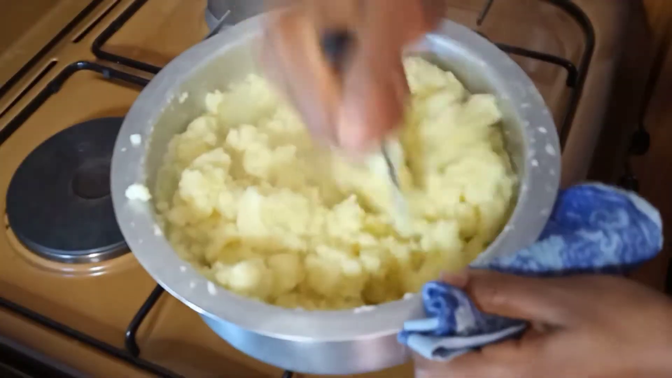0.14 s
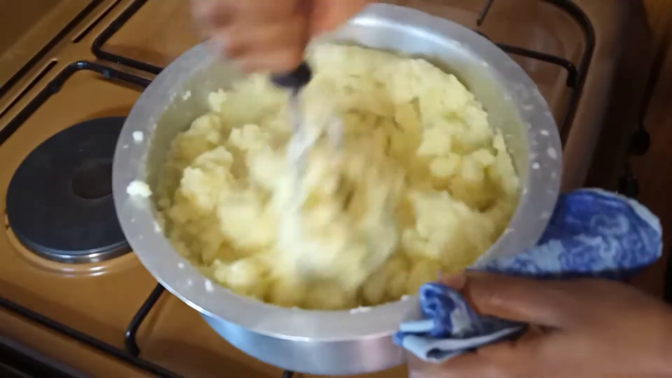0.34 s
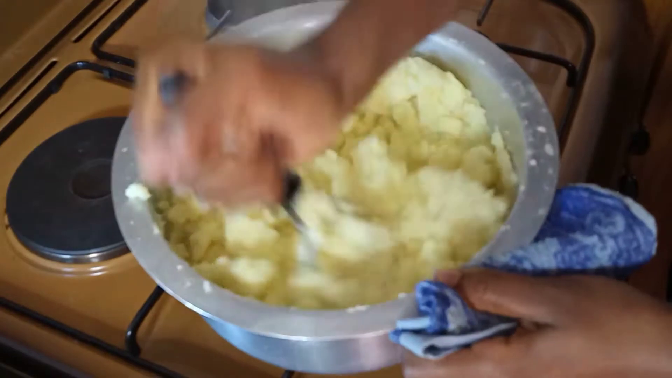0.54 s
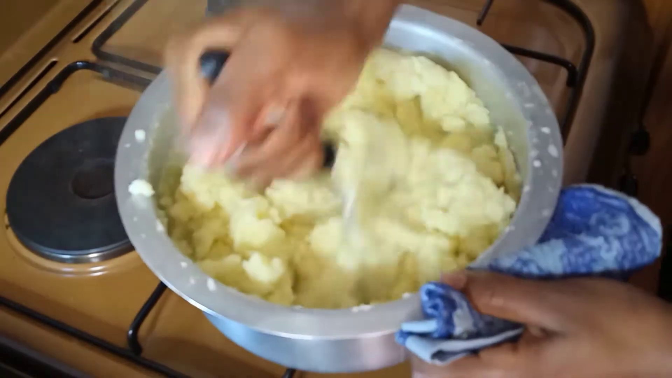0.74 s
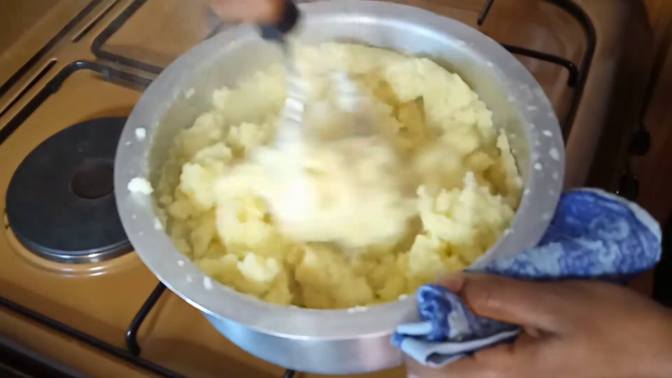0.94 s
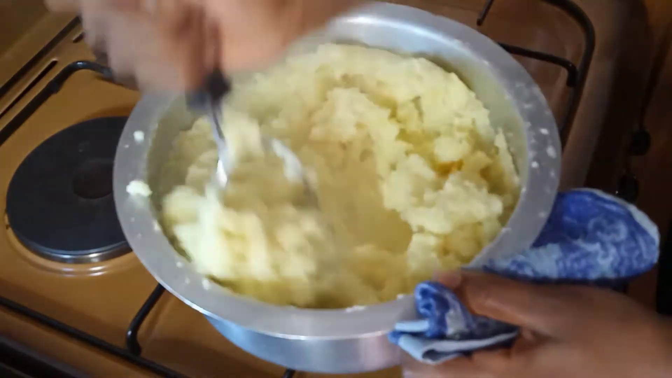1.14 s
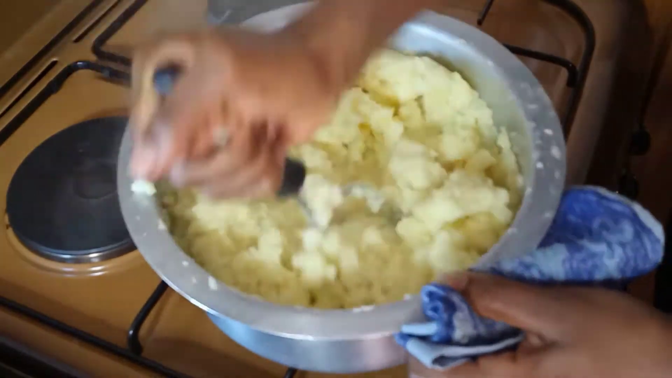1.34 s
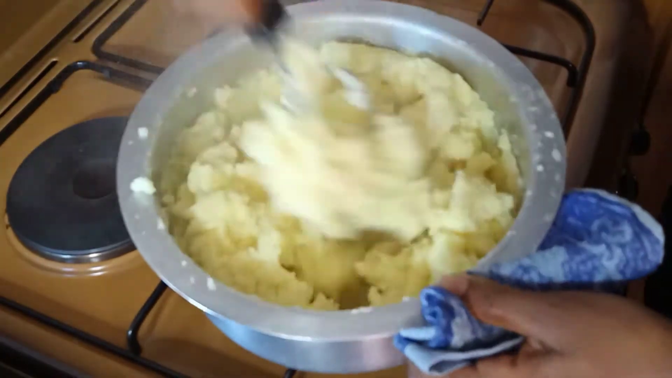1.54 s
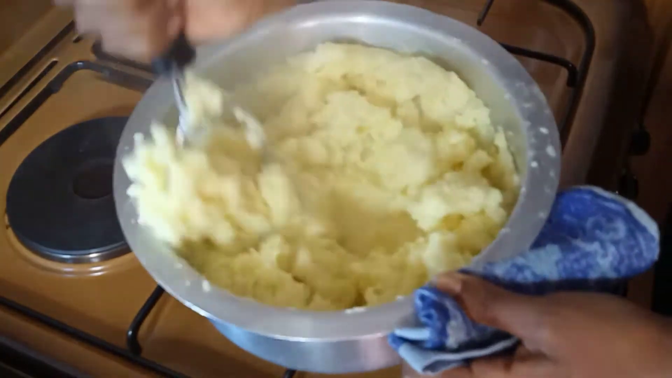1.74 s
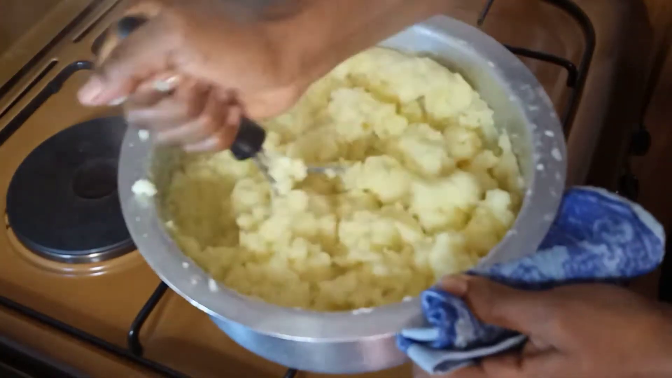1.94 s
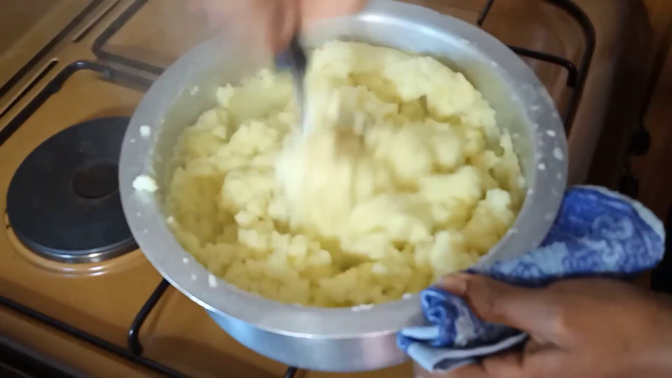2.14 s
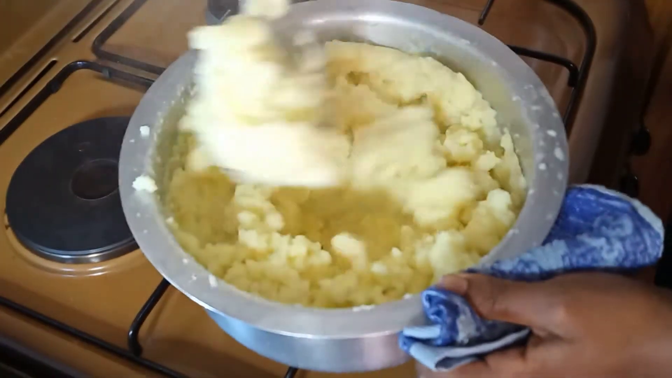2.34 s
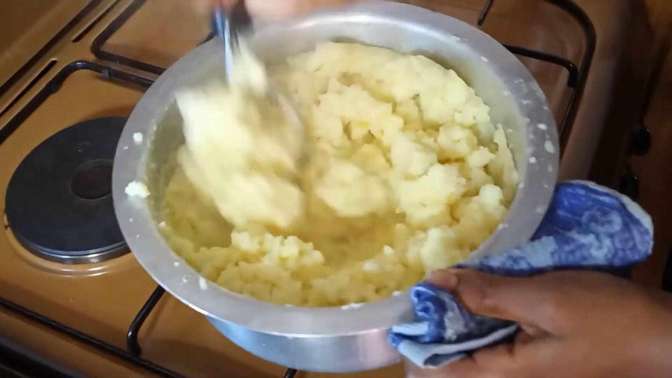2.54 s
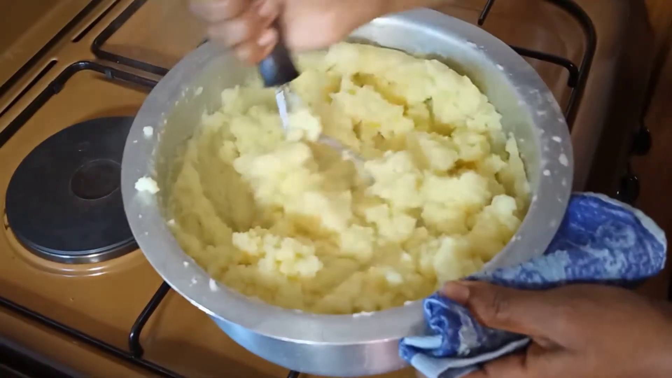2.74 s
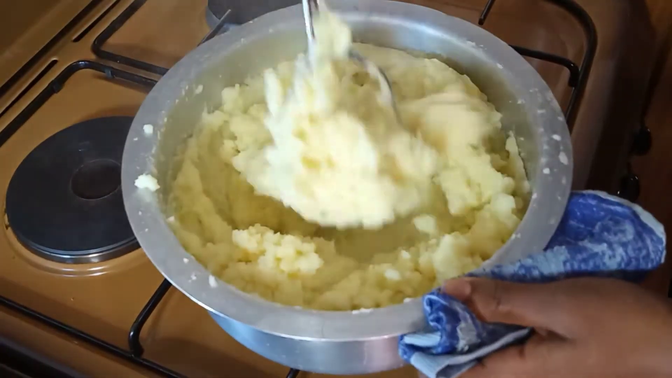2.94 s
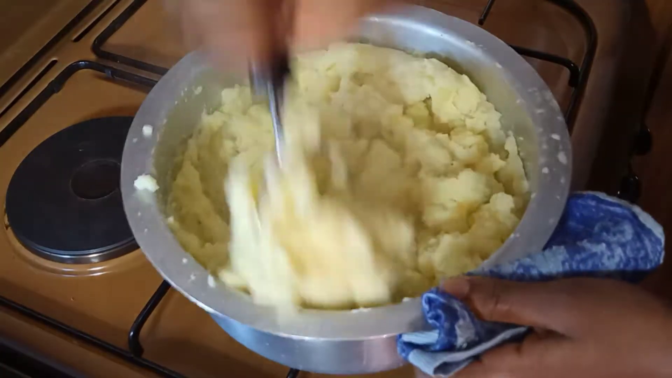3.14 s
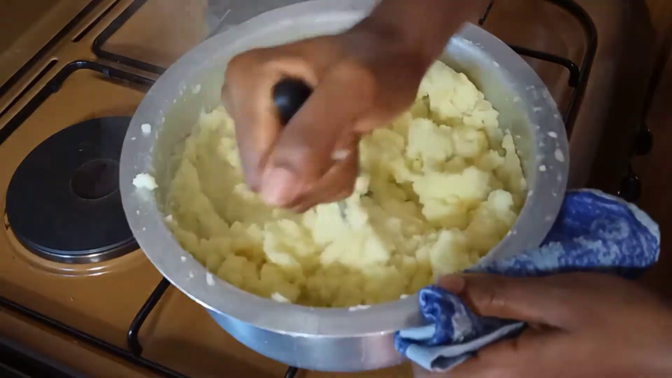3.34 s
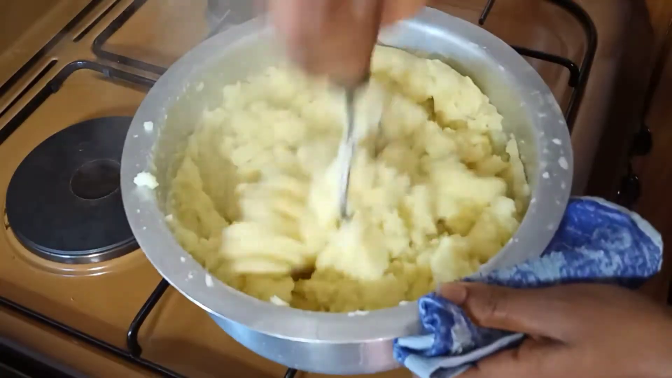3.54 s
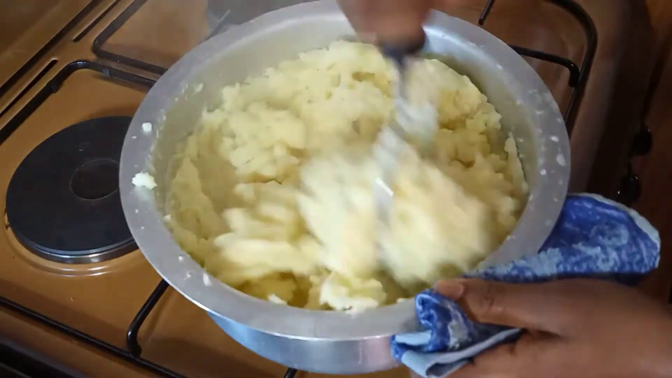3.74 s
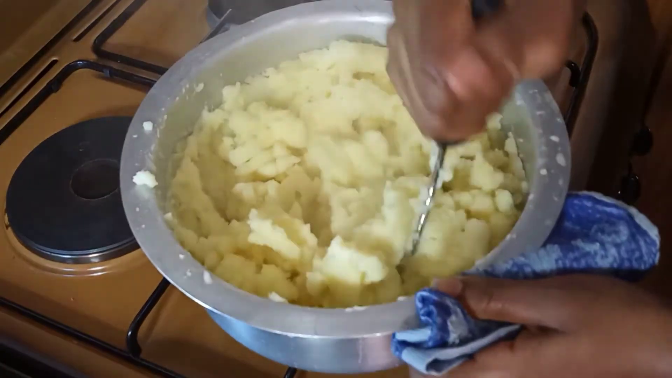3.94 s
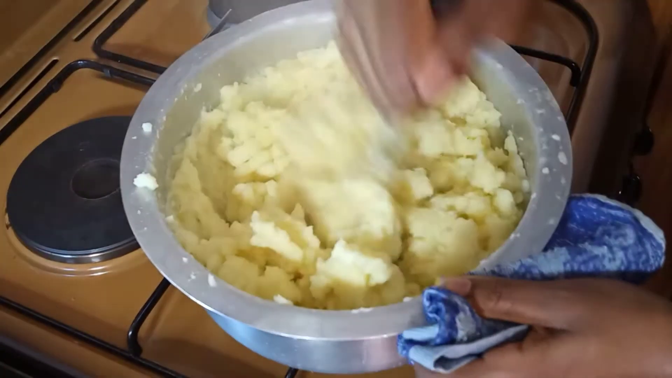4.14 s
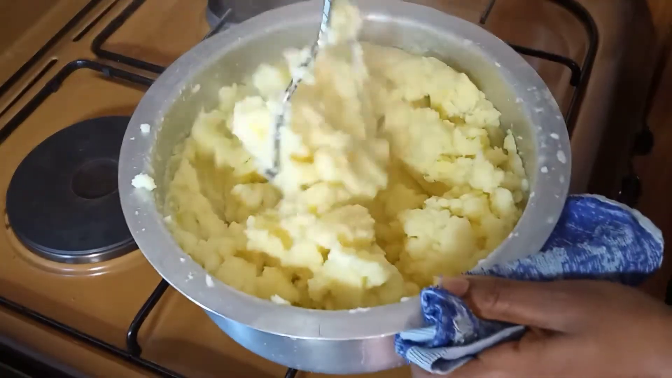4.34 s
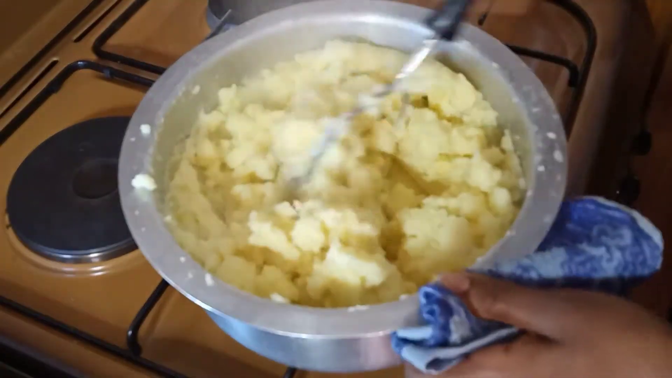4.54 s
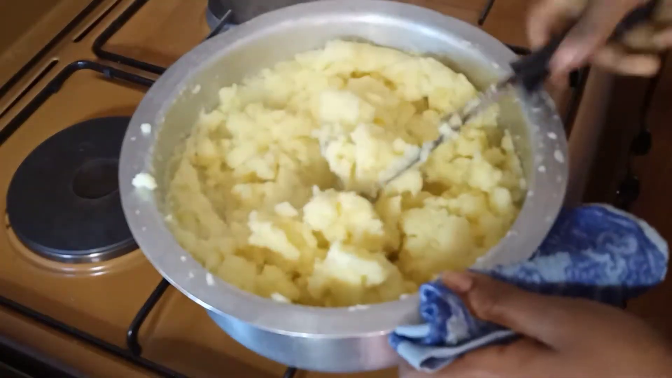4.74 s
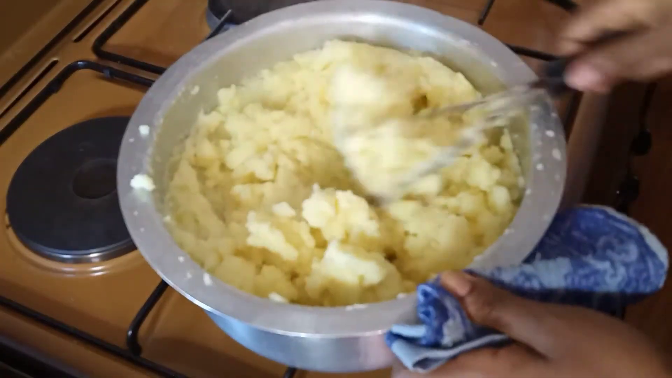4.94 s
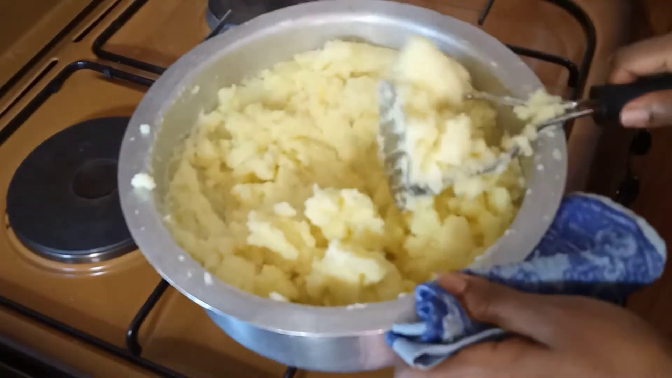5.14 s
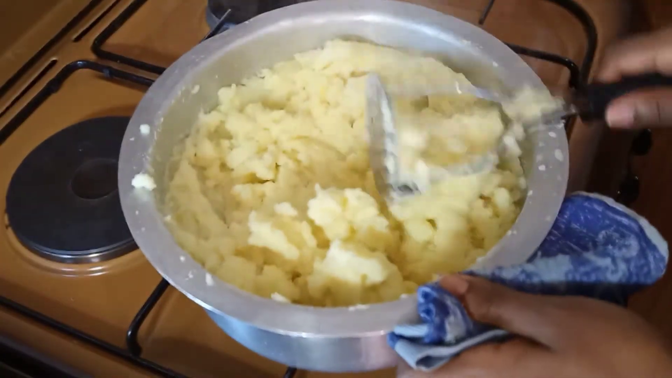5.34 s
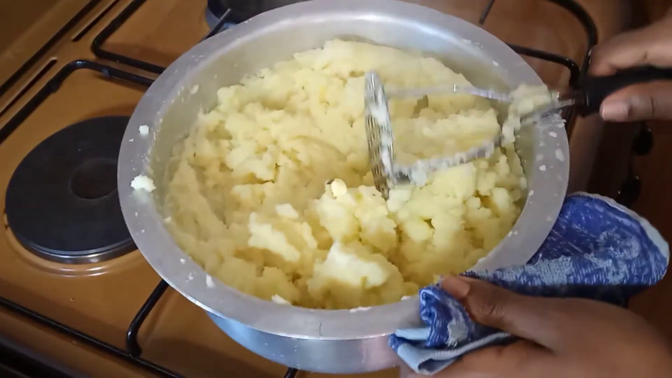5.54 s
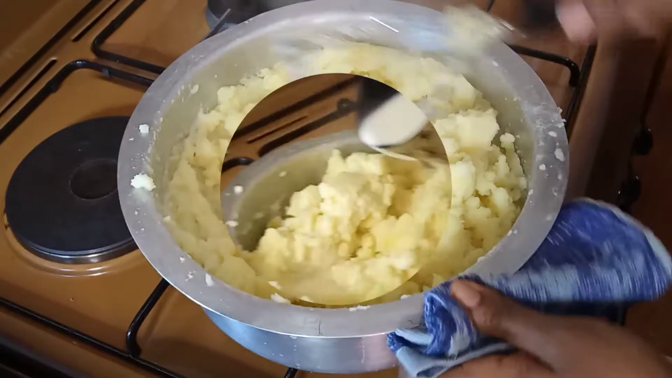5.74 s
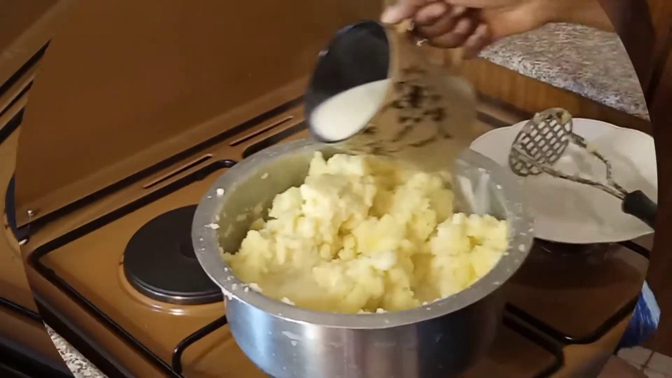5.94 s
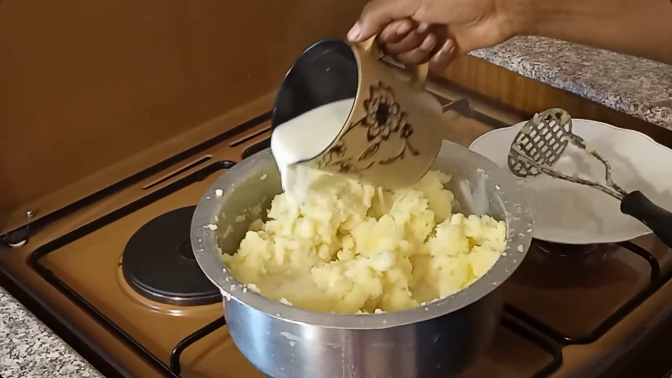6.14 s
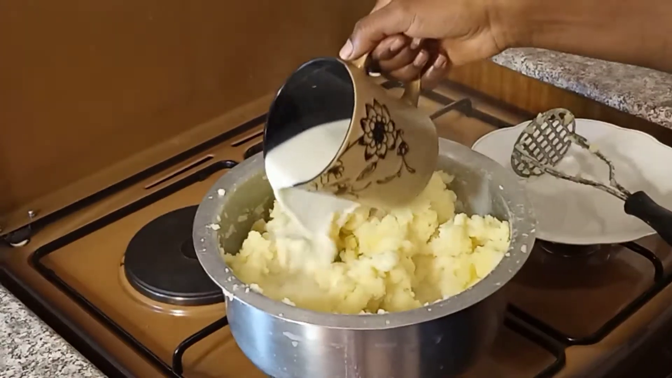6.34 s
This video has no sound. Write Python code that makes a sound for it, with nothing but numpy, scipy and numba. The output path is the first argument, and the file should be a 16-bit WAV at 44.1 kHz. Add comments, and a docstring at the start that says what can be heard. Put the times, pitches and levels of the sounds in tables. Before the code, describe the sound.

Close in a small hard-walled kitchen, a steel masher plunges through soft potatoes, hitting the base of an aluminium pot about every two thirds of a second. Wet crackling, squelching and small pops surround each hollow thud; some strokes clip the wall with a clack. Then four metallic raps on the rim, the last loudest, ring briefly and fade to faint noise.

```python
"""In a small kitchen, a steel masher lifts and plunges through boiled potatoes in an aluminium pot on a stove.
Each stroke crackles (tiny ruptures) and squelches (low cavities), thuds on the base and sucks free again;
some first clip the wall. Later four raps on the rim set pot, masher and grate ringing (decaying modes).
Then small pops remain over faint noise, the last two as milk drops land. The pot is heard directly and
off hard walls, through a small microphone."""
import sys
import numpy as np
from scipy import signal
from scipy.fft import rfft, irfft
from scipy.io import wavfile
from numba import njit

SR = 44100
rng = np.random.default_rng(int(sys.argv[2]) if len(sys.argv) > 2 else 0)


def wav_record(signal):
    """Record a signal, one row per channel, as 16-bit PCM in the file named by sys.argv[1]."""
    frames = np.transpose(np.atleast_2d(signal))
    bounded = np.clip(frames, -1, 1)
    # unit amplitude maps onto the largest positive 16-bit level
    quanta = np.round(bounded * 32767).astype(np.int16)
    wavfile.write(sys.argv[1], SR, quanta)


N = 281358
T = np.arange(int(.6 * SR)) / SR  # time axis of one event [s]

# down-strokes: (enters the mash [s], meets the base [s], thud level [dB], thud pitch [Hz], grinding time [s],
# stove boom [dB], crackle on entry [dB], crackle at the base [dB], squelch at the base [dB])
STROKES = [(0.275, 0.474, -6, 879, 0.016, -32, -57.5, -45, -33),
           (0.992, 1.161, -5, 926, 0.019, -26, -56.5, -37, -30.5),
           (1.61, 1.801, -7, 793, 0.012, -34.5, -51, -36, -29),
           (2.339, 2.552, -12.5, 718, 0.0038, -38, -41, -52, -44),
           (3.031, 3.1882, -5, 782, 0.006, -38.5, -47.5, -42.5, -24.5),
           (3.647, 3.790, -22.5, 693, 0.025, -38, -51, -44.5, -35.5)]
# jolts of the pot as lumps give way or cling: (time [s], level [dB], pitch [Hz], grit [dB])
JOLTS = [(.017, -26, 796, -13), (.094, -23, 697, -23.5), (0.2028, -31, 630, -34.5),
         (0.402, -24.5, 660, -20), (.432, -17, 750, -26), (1.087, -26.5, 720, -14), (1.130, -16, 830, -16),
         (1.379, -21.5, 783, -26), (1.479, -35, 1000, -29), (1.763, -12, 900, -11),
         (2.484, -17.5, 810, -12), (3.1063, -18, 610, -5.5), (3.166, -11.5, 706, -27),
         (3.381, -28.5, 754, -35), (3.679, -19.5, 980, -16.5), (3.7665, -14, 755, -22),
         (4.445, -45, 697, -12)]
JOLT_GRIND_S = 0.0075
# a plate that grinds for longer picks up more grit
GRIT_DB, GRIT_AT_S, GRIT_DB_PER_DOUBLING = -13.5, .02, 11.5


def base_blows():
    """Each stroke ends on the base; jolts are thuds of the same kind, all with one grinding time."""
    blows = []
    for _, s, db, hz, grind_s, *_ in STROKES:
        grit_db = GRIT_DB + GRIT_DB_PER_DOUBLING * np.log2(grind_s / GRIT_AT_S)
        blows.append((s, db, hz, grind_s, grit_db))
    return blows + [(s, db, hz, JOLT_GRIND_S, grit_db) for s, db, hz, grit_db in JOLTS]


# spectrum of the plate rubbing on the base: (frequency [Hz], level [dB])
GRIND = [(60, -20), (200, -5.5), (330, 5), (600, -1.5), (1000, -2), (1500, -3), (2100, -11.5),
         (4000, -39.5), (16000, -50.5)]
# spectrum of the grit under the plate: (frequency [Hz], level [dB])
GRIT = [(300, -16.5), (1200, 3.5), (2200, 7), (3600, 5.5), (6000, -1.5), (16000, -17)]
# modes of the loaded pot: (frequency [Hz], level [dB])
POT = [(277, -7.5), (370, -5.5), (405, -6), (458, -10.5), (528, -6.5), (600, -0.5), (662, -2), (690, -16.5),
       (790, -0.5), (900, 2.5), (985, -2.5), (1113, -4), (1212, -13), (1425, -8.5), (1688, -14),
       (2100, -12), (2277, -6.5), (2610, -9.5), (3467, -9)]
POT_T60_S = .24


def thuds(ring_db=-9, tone_db=-6):
    """The plate grinds to a stop on the base, at a pitch that depends on the mash lying on it."""
    out = np.zeros(N)
    for s, db, hz, grind_s, grit_db in base_blows():
        press = (1 - np.exp(-T / 0.00062)) * np.exp(-T / grind_s)
        slips, grains = rng.standard_normal((2, len(T)))
        rub = signal.hilbert(resonate(colour(slips, GRIND), hz, q=2.2))
        # the arm's steady weight evens out the slips
        even_rub = rub.real / np.sqrt(np.abs(rub) + 1e-9)
        rub = unit(press * even_rub)
        # the more mash cushions the plate, the less grit and the purer the base's hollow note
        phase = 2 * np.pi * np.cumsum(hz * (1 + .05 * walk(T, 120))) / SR
        note = unit(press * np.sin(phase))
        base = unit(rub + undb(tone_db - (grit_db + 20) * .7) * note)
        blow = base + undb(grit_db) * unit(colour(grains * press, GRIT))
        pot = modes(POT, POT_T60_S, shift=rng.uniform(.97, 1.03))
        ring = unit(through(blow, pot))
        # longer grinding carries more energy
        add(out, s, undb(db) * np.linalg.norm(press) / 2 * (blow + undb(ring_db) * ring))
    return out


# the plate pulls free and rocks the pot:
# (time [s], tearing level [dB], suction level [dB], tearing cavity pitch [Hz], stove boom [dB])
LIFTS = [(0, -52.5, -40.5, 3360, -33.5), (0.614, -54, -49.5, 4600, -53), (1.305, -52, -43.5, 4200, -31.5),
         (2.011, -53.5, -63, 3200, -50.5), (2.654, -51.5, -43, 4850, -67.5), (3.32, -50, -60, 4100, -48),
         (3.977, -49.5, -47.5, 3700, -48.5)]
# every lift lasts and fades alike
LIFT_S, LIFT_FADE_DB, SUCTION_HZ = 0.099, 5.5, 668.6
PRESS_CAVITY_HZ = 3300


def tearing():
    """The mash crackles all the way down, and again as the plate pulls free."""
    down = [(enter, base, entry_db, base_db, PRESS_CAVITY_HZ)
            for enter, base, *_, entry_db, base_db, _ in STROKES]
    up = [(s, s + LIFT_S, db, db - LIFT_FADE_DB, hz) for s, db, _, hz, _ in LIFTS]
    return down + up


# clots slump off the raised plate: (time [s], level [dB], cavity pitch [Hz])
CLOTS = [(.76, -53.5, 1400), (1.544, -56, 1100), (2.591, -46, 705), (3.549, -63, 1080), (4.165, -53, 491),
         (4.22, -52.5, 560)]
CLOT_S, CLOT_FADE_DB = .055, 7
# the squelch builds as the mash is packed under the plate, and drains once it stops
SQUEEZE_S, SQUEEZE_RISE_DB, SQUEEZE_HZ = .1, 15, 840


def squeezing():
    """The mash squelches just above the base, sucks at the rising plate and slumps off it."""
    down = [(base - SQUEEZE_S, base, db - SQUEEZE_RISE_DB, db, SQUEEZE_HZ) for _, base, *_, db in STROKES]
    up = [(s, s + LIFT_S, db, db - LIFT_FADE_DB, SUCTION_HZ) for s, _, db, *_ in LIFTS]
    slumps = [(s, s + CLOT_S, db, db - CLOT_FADE_DB, hz) for s, db, hz in CLOTS]
    return down + up + slumps


def ticks(rate, spread_db, spectrum):
    """A dense rain of tiny ruptures of uneven size, rate per second, with an rms of one."""
    sizes = undb(spread_db * np.minimum(rng.exponential(size=N), 4))
    clicks = (rng.random(N) < rate / SR) * sizes * rng.choice([-1, 1], N)
    return unit(colour(clicks, spectrum)) * np.sqrt(N)


# spectrum of the tearing mash: (frequency [Hz], level [dB])
CRACKLE = [(300, -20.5), (1200, 4), (2100, -0.5), (3400, 2.5), (4600, -6), (6500, -0.5), (9000, -17),
           (16000, -10)]
# spectrum of the squeezed mash: (frequency [Hz], level [dB])
SQUELCH = [(60, -17.5), (200, -13.5), (400, -2.5), (700, -4.5), (1100, -10.5), (1700, -7), (6000, -45.5),
           (16000, -64.5)]


def mash(moves, spectrum, rate, spread_db, q, cavity_db, lumpy_db, swell_s, stop_s=0.025):
    """Tiny ruptures come in lumps and ring two cavities in the mash, which keep changing size."""
    out, ruptures = np.zeros(N), ticks(rate, spread_db, spectrum)
    for start, end, from_db, to_db, hz in moves:
        span = max(end - start, stop_s)
        t = T[:int((span + stop_s) * SR)]
        gate = np.clip(np.minimum(t / swell_s, (span + stop_s - t) / stop_s), 0, 1)
        lumps = undb(lumpy_db * walk(t, 70))
        grains = ruptures[max(int(start * SR), 0):][:len(t)] * gate * lumps
        # one cavity drifts slowly, the other flutters from hole to hole
        slow = sweep(grains, np.minimum(hz * np.exp(.1 * walk(t, 20)), SR / 3), float(q))
        quick = sweep(grains, np.minimum(hz * np.exp(.28 * walk(t, 70)), SR / 3), float(q))
        cavities = unit(slow) + unit(quick)
        sound = unit(unit(grains) + undb(cavity_db) * cavities) * np.sqrt(span * SR)
        add(out, start, sound * undb(np.interp(t, [0, span], [from_db, to_db])))
    return out


def hollow(x):
    """Sound from the mash bounces between the pot's walls on its way out."""
    bounces = rng.standard_normal(len(T)) * np.exp(-T / .002) * (T > .0005)
    return x + undb(-7) * through(x, unit(bounces))


def bubbles(moves, count, above_db, scatter_db, octaves):
    """Every move of the mash bursts small air pockets, at chance moments and around its cavity pitch."""
    rows = []
    for start, end, from_db, to_db, hz in moves:
        for when, size, pitch in rng.random((count, 3)):
            s = start + when * (end - start)
            db = from_db + when * (to_db - from_db) + above_db + scatter_db * (2 * size - 1)
            pitch_hz = hz * 2 ** (octaves * (2 * pitch - 1))
            rows.append((s, db, min(pitch_hz, SR / 3)))
    return rows


def pops(table, cycles=3.2, snap_db=-11):
    """Each small cavity rings for a few cycles as it snaps open."""
    out, t = np.zeros(N), T[:int(.05 * SR)]
    for s, db, hz in table:
        cavity = np.sin(2 * np.pi * hz * t) + undb(snap_db) * rng.standard_normal(len(t))
        add(out, s, undb(db) * cavity * (1 - np.exp(-t * hz)) * np.exp(-t * hz / cycles))
    return out


# single pops at set times, the last two as milk drops land: (time [s], level [dB], pitch [Hz])
POPS = [(.346, -29, 3300), (1.116, -13.5, 3440), (1.544, -29.5, 4954), (1.731, -20.5, 3400),
        (2.045, -30, 3290), (3.117, -14.5, 3040), (3.151, -17.5, 3040), (4.037, -22.5, 4860),
        (4.071, -31, 3120), (4.35, -43.5, 3020), (4.375, -37, 5510), (5.936, -45, 2830),
        (6.265, -32.5, 5760), (6.317, -31.5, 3860)]


def air_pockets(resting_db=-61, resting_hz=3000):
    """Single pops, small bright ones where the mash tears, low plops where squeezed, faint ones throughout."""
    bright = bubbles(tearing(), count=6, above_db=7.5, scatter_db=5.5, octaves=0.5)
    low = bubbles(squeezing(), count=3, above_db=7, scatter_db=9, octaves=0.9)
    resting = [(0, N / SR, resting_db, resting_db, resting_hz)]
    faint = bubbles(resting, count=70, above_db=5.5, scatter_db=7.5, octaves=1)
    return pops(POPS + bright + low + faint)


# the masher clips the pot's wall on its way down:
# (time [s], level [dB], thump pitch [Hz], crack [dB], wall ring [dB], stove boom [dB])
KNOCKS = [(1.6054, -10.5, 650.5, 4, -4, -41), (2.3234, -10, 656, -1.5, -13.5, -41.5),
          (3.023, -11.5, 520, -0.5, -10.5, -64.5)]
KNOCK_SWELL_CYCLES, KNOCK_TOP_HZ = 0.73, 6400
# spectrum of the crack on the wall: (frequency [Hz], level [dB])
CRACK = [(100, -18), (350, -19), (900, 3.5), (1500, 3), (2300, -6), (3600, -6), (6000, -17), (16000, 9)]


def wall_blows():
    """Glancing blows on the wall all share one upper limit to their crack."""
    return [(s, db, hz, KNOCK_SWELL_CYCLES / hz, crack_db, KNOCK_TOP_HZ, ring_db)
            for s, db, hz, crack_db, ring_db, _ in KNOCKS]


# the masher's shaft raps the rim: (time [s], level [dB], thump pitch [Hz])
RAPS = [(4.6211, -11.5, 571), (4.9947, -15, 515), (5.1790, -6.5, 478), (5.3589, -1.5, 544)]
# a rap at 0 dB, relative to its thump; softer raps crack and ring less, and duller
RAP_SWELL_CYCLES, RAP_CRACK_DB, RAP_RING_DB, RAP_BOOM_DB, RAP_TOP_HZ = 0.89, -4, -5, -22.5, 6200
RAP_HARDNESS_DB_PER_DB, RAP_DB_PER_OCTAVE = 0.69, 10.5
# spectrum of the crack on the rim: (frequency [Hz], level [dB])
RIM = [(100, -6.5), (350, -4), (1000, 4.5), (1650, -8), (2550, -1), (3400, -6), (6000, -11.5),
       (16000, -4.5)]


def rim_blows():
    """The harder the rap, the more and the brighter it cracks and the more it rings."""
    blows = []
    for s, db, hz in RAPS:
        hardness_db = RAP_HARDNESS_DB_PER_DB * db
        top_hz = RAP_TOP_HZ * 2 ** (db / RAP_DB_PER_OCTAVE)
        blows.append((s, db, hz, RAP_SWELL_CYCLES / hz, RAP_CRACK_DB + hardness_db,
                      top_hz, RAP_RING_DB + hardness_db))
    return blows


def knocks(blows, spectrum, pot, rise_s, tick_s, chatter_db, chatter_s, sheen_db):
    """Metal meets metal: the pot heaves for a few cycles, the contact cracks, the pot rings on."""
    out = np.zeros(N)
    for s, db, hz, swell_s, crack_db, top_hz, ring_db in blows:
        thump = T / swell_s * np.exp(1 - T / swell_s) * np.sin(2 * np.pi * hz * T)
        size = np.linalg.norm(thump)
        # a hard tick, then the masher chatters briefly on the metal
        decay = np.exp(-T / tick_s) + undb(chatter_db) * np.exp(-T / chatter_s)
        force = (1 - np.exp(-T / rise_s)) * decay
        contact = colour(rng.standard_normal(len(T)) * force, spectrum)
        crack = signal.lfilter(*signal.butter(3, min(top_hz, SR / 3), fs=SR), contact)
        # unfiltered noise that drops away steeply on duller contacts
        sheen_gain = undb(sheen_db) * min(top_hz / 6500, 1) ** 5
        sheen = sheen_gain * unit(rng.standard_normal(len(T)) * force)
        blow = thump + size * undb(crack_db) * (unit(crack) + sheen)
        ring = size * undb(ring_db) * unit(through(blow, pot))
        add(out, s, undb(db) * (blow + ring))
    return out


# modes of the masher's steel frame: (frequency [Hz], level [dB])
MASHER = [(1690, -6), (2102, -6), (2277, -6), (2420, -3.5), (2612, -7), (2900, -11)]


def masher(clank_db=-21, clank_t60_s=0.032, sing_db=-51, sing_t60_s=0.94, detune=.07):
    """The steel frame clanks at each rap; its bars, each tuned a little differently, sing on faintly."""
    out = np.zeros(N)
    for s, db, _ in RAPS:
        add(out, s, undb(db + clank_db) * modes(MASHER, clank_t60_s))
        bar_db = db * (3.5 + RAP_HARDNESS_DB_PER_DB) + sing_db
        for offset in 2 * rng.random(size=4) - 1:
            add(out, s, undb(bar_db) * modes(MASHER, sing_t60_s, shift=1 + detune * offset))
    return out


# modes of the iron grate that carries the pot: (frequency [Hz], level [dB])
GRATE = [(131, 8), (158, -5.5), (203, -5)]


def grate(db=-20, t60_s=0.23, swell_s=.03):
    """A rap on the rim tips the pot against its grate, which answers with a low thrum."""
    out, thrum = np.zeros(N), modes(GRATE, t60_s)
    thrum = thrum * (1 - np.exp(-T[:len(thrum)] / swell_s))
    for s, rap_db, _ in RAPS:
        add(out, s, undb(db + rap_db * (1.5 + RAP_HARDNESS_DB_PER_DB)) * thrum)
    return out


def stove_loads():
    """When and how hard the pot pushes on the stove: (time [s], level [dB])."""
    strokes = [(s, boom_db) for _, s, _, _, _, boom_db, *_ in STROKES]
    lifts_and_knocks = [(s, boom_db) for s, *_, boom_db in LIFTS + KNOCKS]
    raps = [(s, RAP_BOOM_DB + db * (0.5 + RAP_HARDNESS_DB_PER_DB)) for s, db, _ in RAPS]
    return strokes + lifts_and_knocks + raps


# modes of the stove top under the pot: (frequency [Hz], level [dB])
STOVE = [(68, -2), (86, 9.5), (99, 5), (133, -4.5), (182, -24.5), (232, -7.5)]
STOVE_T60_S = .33
# spectrum of the shuddering sheet metal: (frequency [Hz], level [dB])
RUMBLE = [(25, -13), (60, 1.5), (90, 2), (170, -15), (300, -11), (600, -44), (2000, -81)]


def stove(swell_s=0.061, rumble_db=-10, rumble_s=0.11):
    """Strokes, lifts, knocks and raps load the sheet-metal stove top, which shudders and booms late and low."""
    out, boom = np.zeros(N), np.zeros(len(T))
    add(boom, 0, modes(STOVE, STOVE_T60_S))
    boom *= 1 - np.exp(-T / swell_s)
    shudder = (1 - np.exp(-T / swell_s)) * np.exp(-T / rumble_s)
    rumble = np.pad(colour(rng.standard_normal(N), RUMBLE), (0, len(T)))
    for s, boom_db in stove_loads():
        panel = unit(rumble[int(s * SR):][:len(T)] * shudder)
        add(out, s, undb(boom_db) * (boom + undb(rumble_db) * np.linalg.norm(boom) * panel))
    return out


# reverberation of the kitchen: (frequency [Hz], t60 [s])
KITCHEN = [(100, 0.3), (500, 0.29), (1500, 0.32), (4000, 0.22), (8000, 0.11), (15000, 0.22)]


def kitchen(first_s=0.0048, build_s=0.0063):
    """Close hard walls: a dense tail that starts almost at once and dies soonest around 8 kHz."""
    hz = np.fft.rfftfreq(len(T), 1 / SR)
    noise, out = rfft(rng.standard_normal(len(T))), 0
    centres = np.geomspace(60, 16000, 16)
    for centre, pick in zip(centres, np.eye(len(centres))):
        share = at_hz(np.c_[centres, pick], hz)  # this band's part of the spectrum
        decay = np.exp(-np.log(1000) * T / at_hz(KITCHEN, centre))
        tail = irfft(noise * share, len(T)) * decay
        tail *= np.clip((T - first_s) / build_s, 0, 1)
        out = out + unit(tail) * np.sqrt(share.sum())
    return unit(out)


# spectrum of the faint background: (frequency [Hz], level [dB])
QUIET = [(18, -40), (30, -17), (100, -1), (303, -4), (1190, -12), (5040, -20), (8300, -23), (16000, -20)]


def background(rms_db=-69):
    """A faint, steady noise, strongest in the low range."""
    return undb(rms_db) * np.sqrt(N) * unit(colour(rng.standard_normal(N), QUIET))


def undb(db):
    """Decibels to gain."""
    return 10 ** (np.asarray(db) / 20)


def unit(x):
    """Scale to an energy of one."""
    return x / np.sqrt(np.sum(x ** 2))


def at_hz(points, hz):
    """Read (frequency [Hz], value) points on a log-frequency axis."""
    f, value = np.transpose(points)
    return np.interp(np.log(np.maximum(hz, 1)), np.log(f), value)


def colour(x, points, size=4096):
    """Minimum-phase filter with the given (frequency [Hz], level [dB]) response."""
    cepstrum = irfft(np.log(undb(at_hz(points, np.fft.rfftfreq(size, 1 / SR)))))
    # folding the cepstrum forward makes the response causal
    cepstrum[1:size // 2] *= 2
    cepstrum[size // 2 + 1:] = 0
    return through(x, irfft(np.exp(rfft(cepstrum))))


def through(x, response):
    """Pass a sound through an impulse response."""
    return signal.fftconvolve(x, response)[:len(x)]


def resonate(x, hz, q):
    """One resonance."""
    return signal.lfilter(*signal.iirpeak(min(hz, SR / 3), max(q, 1), fs=SR), x)


@njit
def sweep(x, hz, q):
    """A resonance whose centre moves with every sample."""
    y, band, low = np.empty(len(x)), 0., 0.
    for i in range(len(x)):
        g = np.tan(np.pi * hz[i] / SR)
        v = (band + g * (x[i] - low)) / (1 + g * (g + 1 / q))
        band, low, y[i] = 2 * v - band, low + 2 * g * v, v / q
    return y


def modes(table, t60_s, shift=1):
    """Impulse response of decaying modes, each with a chance phase, at most as long as T."""
    t = T[:int(1.2 * t60_s * SR)]
    tones = sum(undb(db) * np.sin(2 * np.pi * (shift * hz * t + rng.random())) for hz, db in table)
    return np.exp(-np.log(1000) * t / t60_s) * tones


def walk(t, rate):
    """A random drift through a new chance value rate times a second."""
    return np.interp(t * rate, np.arange(256), rng.standard_normal(256))


def add(track, s, sound):
    """Mix a sound into the track at time s."""
    i = max(int(s * SR), 0)
    track[i:i + len(sound)] += sound[:N - i]


def scene(knock_room_db=-5, rap_room_db=-1, thud_room_db=-4, mash_room_db=-8):
    """All the sounds of the pot, the kitchen's answer and the faint background."""
    pot, room = modes(POT, POT_T60_S), kitchen()
    base = thuds()
    crackle = mash(tearing(), CRACKLE, rate=1300, spread_db=5.4, q=7, cavity_db=-5, lumpy_db=3.5, swell_s=.03)
    squelch = mash(squeezing(), SQUELCH, rate=900, spread_db=3.5, q=8, cavity_db=-2, lumpy_db=2.5,
                   swell_s=.022)
    wet = hollow(crackle) + squelch + air_pockets()
    wall = knocks(wall_blows(), CRACK, pot, rise_s=0.00057, tick_s=0.0012,
                  chatter_db=-18.5, chatter_s=0.016, sheen_db=-17)
    rim = knocks(rim_blows(), RIM, pot, rise_s=0.003, tick_s=0.0013,
                 chatter_db=-27.5, chatter_s=0.026, sheen_db=-3.5)
    rim = rim + masher()
    # the less a sound reaches the walls, the closer it seems
    send = undb(knock_room_db) * wall + undb(rap_room_db) * rim
    send = send + undb(thud_room_db) * base + undb(mash_room_db) * wet
    direct = base + wet + wall + rim
    return (direct + through(send, room) + stove() + grate() + background())[None]


# response of the microphone: (frequency [Hz], level [dB])
MICROPHONE = [(20, -18), (45, -10), (75, 0), (6800, 0), (8200, -8), (13500, -8), (15200, -2), (16500, -11)]
TOP_HZ = 16300


def record(dry):
    """A small microphone: thin deep bass, a step down in the treble, rounded peaks, a steep cut at the top."""
    x = colour(dry[0], MICROPHONE)
    x = x / (1 + (x / .8) ** 4) ** .25  # peaks level off towards .8
    return signal.sosfilt(signal.ellip(8, .2, 80, TOP_HZ, fs=SR, output="sos"), x)[None]


dry = scene()
out = record(dry)
wav_record(out)
```